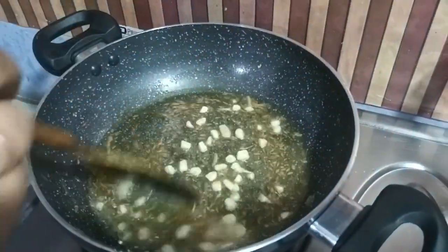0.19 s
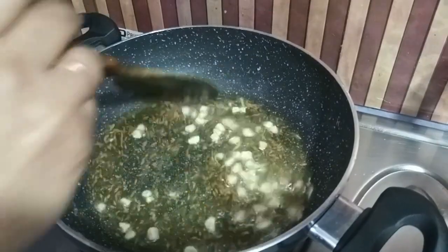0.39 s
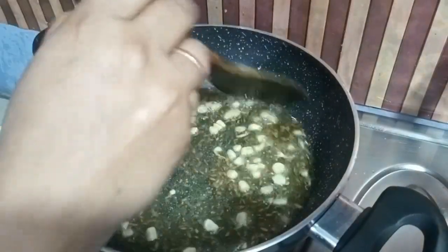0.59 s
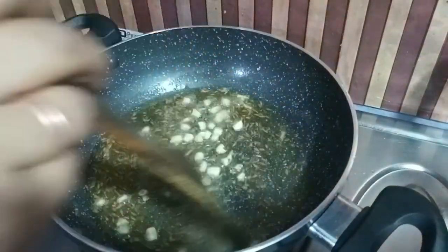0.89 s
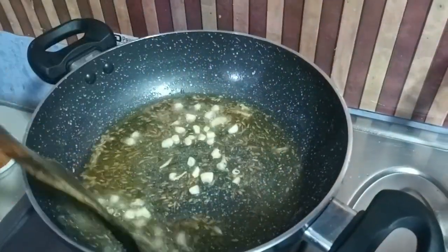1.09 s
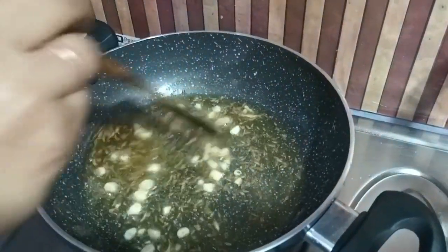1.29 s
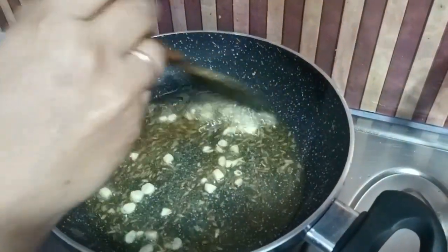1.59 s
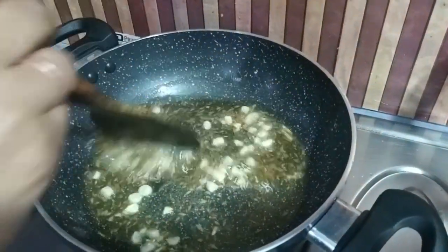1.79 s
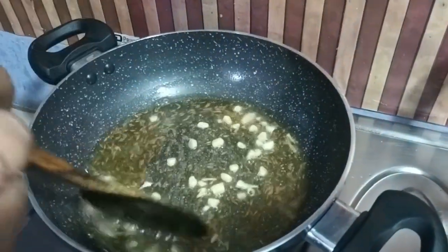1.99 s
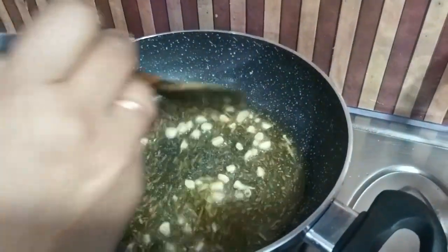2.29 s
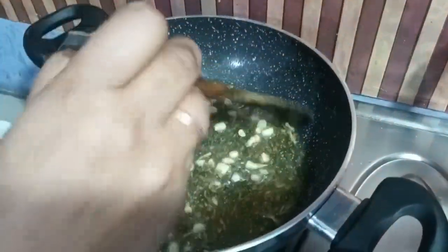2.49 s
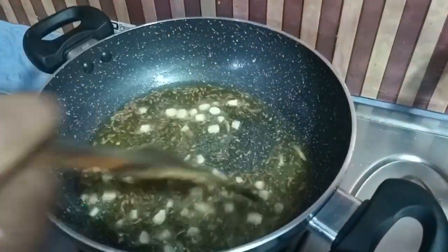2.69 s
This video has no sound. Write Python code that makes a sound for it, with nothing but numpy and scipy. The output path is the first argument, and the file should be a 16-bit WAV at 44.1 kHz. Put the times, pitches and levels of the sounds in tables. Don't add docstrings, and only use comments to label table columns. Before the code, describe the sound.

Garlic and seeds fry with a steady, bright, fine sizzle while a wooden spatula scrapes and knocks the ringing pan; oil spits, low thumps jolt the handheld phone, and the hardest clack comes midway, close up in a kitchen.

```python
import sys
import numpy as np
from scipy import signal
from scipy.fft import rfft, irfft
from scipy.io import wavfile
from scipy.ndimage import uniform_filter1d

SR = 44100
rng = np.random.default_rng(int(sys.argv[2]) if len(sys.argv) > 2 else 0)


def elevation(decibels):
    levels = np.asarray(decibels, float)
    return 10 ** (levels / 20)


def transcribe(u):
    v = np.clip(np.atleast_2d(u).T, -1, 1)
    q = np.round(v * 32767).astype(np.int16)
    wavfile.write(sys.argv[1], SR, q)


N = 125685


def unit(x):
    return x / np.sqrt(np.mean(x ** 2))


def band(x, hz, width_hz):
    return signal.lfilter(*signal.iirpeak(min(hz, 9900.), hz / width_hz, fs=SR), x)


def band_twice(x, hz, width_hz):
    return band(band(x, hz, width_hz), hz, width_hz)


def filter_steep(x, design):
    return signal.sosfilt(design, x)


def level_curve(table):
    return elevation(np.interp(np.arange(N) / SR, *np.array(table).T))


def walk(rate_hz):
    hold = int(SR / rate_hz)
    steps = np.repeat(rng.standard_normal(N // hold + 1), hold)
    return 1.4 * uniform_filter1d(uniform_filter1d(steps, hold), hold)[:N]


def clicks(rate_per_s, scatter_db):
    chance, size = rng.random(N), rng.exponential(size=N)
    sign = np.sign(chance - rate_per_s / SR / 2) * (chance < rate_per_s / SR)
    return sign * elevation(scatter_db * np.minimum(size, 5))


def even(x):
    return x / np.sqrt(uniform_filter1d(x ** 2, size=120) + .1)


def fade_60(t, t60_s):
    return 1000. ** (-t / t60_s)


def add(out, at_s, x):
    i = int(at_s * SR)
    out[i:i + len(x)] += x[:N - i]


# (time [s], level [dB])
FIZZ_LEVEL = [
    (0.0, -44),
    (2.09, -44.5),
    (2.54, -46),
    (2.85, -44.5),
]
# (frequency [Hz], spectral level [dB])
FIZZ_COLOUR = [(1200, -15.5), (1650, -12), (2100, -7), (4300, -4.5), (5000, -6.5), (5600, -1.5),
               (7400, -0.5), (8100, -6)]


def fizz():
    bubble_share, whistle_share = 0.18, 0.15
    swell = walk(4.1)
    out = np.zeros(N)
    for hz in 1250 * 2 ** np.arange(0, 3.1, .25):
        bursts = band(clicks(2500 / 8, -2.5), hz, hz / 0.63)
        hiss = unit(rng.standard_normal(N))
        mix = np.sqrt(bubble_share) * unit(bursts) + np.sqrt(1 - bubble_share) * hiss
        whistles = np.zeros(N)
        for pitch_hz in hz * rng.uniform(.92, 1.0, 3):
            whistles += band(clicks(360 / 40, 1.5), pitch_hz, pitch_hz / 400)
        patchy_db = walk(19) + .4 * swell + 1.5 * (1250 / hz) ** 2 * walk(4.0)
        sound = np.sqrt(1 - whistle_share) * unit(band(mix, hz, hz / 5))
        sound += np.sqrt(whistle_share) * unit(whistles)
        out += np.sqrt(hz) * elevation(patchy_db) * sound
    hz, db = np.array(FIZZ_COLOUR).T
    bins_hz = np.arange(N // 2 + 1) * SR / N
    colour = elevation(np.interp(np.log(bins_hz + 1), np.log(hz), db))
    out = unit(irfft(rfft(out) * colour, N))
    wok_air = unit(band(rng.standard_normal(N), 1390, 63))
    return (out + elevation(-20 + 3 * walk(20)) * wok_air) * level_curve(FIZZ_LEVEL)


# (frequency [Hz], level [dB], 60 dB decay [s])
WOK_MODES = [(140, -2, 0.46), (178.6, -11.5, 0.34), (246, -2.5, 0.36), (308, -12.5, .3), (394, -10.5, 0.31),
             (489.4, -7.5, 0.26), (528.6, -8, 0.11), (613, -13.5, .17), (684, -12.5, .16),
             (750.6, -8.5, 0.23), (808, -8.5, 0.3), (881, -10.5, 0.2), (1030, -19, .09), (1382, -3, 0.085)]
RING_T = np.arange(int(.6 * SR)) / SR


def ring(favoured_hz, focus_db):
    t = RING_T
    hz, db, t60_s = np.array(WOK_MODES).T[:, :, None]
    noise = rng.standard_normal((len(WOK_MODES) + 1, len(t)))
    wobble = np.array([unit(band_twice(v, f, 60)) for v, f in zip(noise, hz[:, 0])])
    wobble = .8 * (hz > 330) * wobble * np.minimum(t / 0.011, 1)
    modes = (np.sin(2 * np.pi * hz * t) + wobble) * fade_60(t, t60_s)
    modes = (modes * elevation(db + focus_db * np.abs(np.log2(hz / favoured_hz)))).sum(0)
    rattle = unit(band_twice(noise[-1], favoured_hz, favoured_hz)) * fade_60(t, 0.17)
    return modes / np.abs(modes).max() + elevation(-7 + 0.44 * focus_db) * rattle


# (start [s], length [s], level [dB], brightness [Hz])
STROKES = [(0, 0.082, -65.5, 253), (.21, 0.07, -51, 1050), (.26, 0.076, -51, 600), (.43, 0.2, -53.5, 416),
           (.55, 0.077, -57, 970), (.655, 0.1, -56.5, 1100), (0.743, 0.2, -52.5, 788),
           (.97, 0.09, -68, 352), (1.1, 0.18, -52.5, 476), (1.15, 0.09, -53.5, 710),
           (1.16, 0.17, -54, 1270), (1.3, 0.22, -71.5, 255), (1.463, 0.13, -56, 164),
           (1.55, 0.059, -59, 1100), (1.58, 0.21, -61.5, 678), (2.04, 0.22, -73, 170),
           (2.3, 0.14, -66.5, 250), (2.42, 0.096, -57.5, 300), (2.46, 0.18, -55.5, 860),
           (2.559, 0.2, -59.5, 347)]


def scrapes():
    out = np.zeros(N)
    for at_s, length_s, level_db, bright_hz in STROKES:
        n = int(length_s * SR)
        slip = clicks(1200, 2.5)[:n] + 0.17 * rng.standard_normal(N)[:n]
        brightness = signal.butter(2, [bright_hz / 3, bright_hz], "band", fs=SR, output="sos")
        slip = filter_steep(slip * np.hanning(n), brightness)
        damped_ring = ring(.7 * bright_hz, -6) * np.exp(-RING_T / 0.03)
        sound = unit(signal.fftconvolve(slip, damped_ring))
        sound += elevation(-0.5) * unit(np.pad(slip, (0, len(RING_T) - 1)))
        add(out, at_s, elevation(level_db) * sound / np.sqrt(np.mean(sound[:n] ** 2)))
    return out


# (start [s], length [s], peak [dB], pitch [Hz])
RUBS = [(0, 0.079, -56, 247.6), (.215, 0.054, -46.5, 782), (.24, 0.031, -36.5, 751),
        (.238, 0.032, -43.5, 905), (.245, 0.068, -44.5, 492), (.245, 0.062, -40, 146.5),
        (.33, .03, -57.5, 790), (0.113, .06, -64, 797), (0, 0.13, -56.5, 62), (1.46, .07, -55, 140),
        (2.332, 0.065, -64, 318), (2.6, .08, -60, 331), (1.128, .03, -57, 500), (1.143, 0.036, -48, 650),
        (1.154, 0.022, -41, 770), (1.552, 0.029, -39, 1382), (1.6, 0.13, -43, 250.6),
        (1.72, 0.068, -57.5, 516), (1.78, .07, -64.5, 790), (2.04, 0.083, -63, 140),
        (2.13, 0.071, -58.5, 65.4), (2.3, .1, -59, 110), (2.43, 0.091, -50, 147), (2.66, 0.092, -51.5, 140),
        (0.226, .04, -46.5, 1326), (0.304, 0.034, -51.5, 1372), (.559, 0.043, -32, 249.3),
        (0.6, 0.031, -33.5, 262), (0.632, .035, -36.5, 252), (0.605, .035, -58, 1390),
        (.658, 0.046, -45.5, 1390), (.66, 0.038, -33.5, 144), (0.677, 0.038, -38.5, 244),
        (0.669, .04, -48, 570), (1.103, .04, -41, 109), (1.142, .06, -36, 89.3), (1.195, 0.049, -44, 1410),
        (1.215, 0.061, -31.5, 185.7), (1.231, 0.052, -49, 1440), (1.21, 0.044, -46.5, 884),
        (1.275, 0.05, -45.5, 235), (1.346, .06, -54.5, 240), (1.761, 0.058, -51, 1420)]


def rubs():
    out = np.zeros(N)
    for at_s, length_s, peak_db, hz in RUBS:
        u = np.arange(int(1.5 * length_s * SR)) / (length_s * SR)
        waver = 1 + .008 * walk(60)[:len(u)]
        swell = np.sin(np.pi / 2 * np.minimum(u / .3, 1)) * np.cos(np.pi / 2 * u / 1.5) ** 2
        add(out, at_s, -elevation(peak_db) * swell * np.sin(2 * np.pi * hz * np.cumsum(waver) / SR))
    return out


# (time [s], level [dB])
HAND_LEVEL = [(0, -55), (.07, -61.5), (.18, -77), (.27, -51), (.33, -52), (.6, -54), (.79, -44.5),
              (1, -50.5), (1.08, -55), (1.27, -49), (1.36, -57), (1.43, -88), (1.55, -69), (1.68, -60),
              (1.88, -79.5), (2.4, -75), (2.5, -57), (2.85, -79)]


def hand_tremor():
    rumble = unit(band_twice(rng.standard_normal(N), 88, 95))
    return rumble * level_curve(HAND_LEVEL) * elevation(3.5 * walk(25.19))


# (time [s], peak [dB], favoured pitch [Hz], fall-off away from it [dB per octave])
KNOCKS = [(.2465, -33, 770, -11.5), (.246, -33.5, 1390, -30), (.254, -37.5, 475, -12),
          (.258, -30, 143, -19.5), (.664, -30, 160, -3.5), (.905, -44.5, 800, -26.5),
          (1.186, -34.5, 1030, -20), (1.195, -28.5, 161, -23), (1.5503, -25, 883, -1),
          (1.5514, -18, 610, -4), (1.554, -23, 143, -19.5), (1.5575, -28.5, 860, -11.5),
          (1.562, -28, 535, 2.5), (1.571, -29.5, 755, -12.5), (1.576, -27.5, 140, -14),
          (1.589, -40, 800, -1), (1.6, -31, 250, -12), (2.498, -31, 587, -19), (2.512, -31.5, 244, -5),
          (2.545, -35.5, 258, -23), (2.599, -44, 140, -18)]


def knocks():
    out = np.zeros(N)
    for at_s, peak_db, favoured_hz, focus_db in KNOCKS:
        tock = np.sin(2 * np.pi * favoured_hz * RING_T) * fade_60(RING_T, .02)
        contact = np.hanning(int(0.35 / favoured_hz * SR) + 3)
        hit = np.convolve(ring(favoured_hz, focus_db) + tock, contact)
        swell_s = 0.44 * np.clip(-10.5 - focus_db, .04, 30)
        hit *= 2.0 - np.exp(-np.arange(len(hit)) / SR / swell_s)
        add(out, at_s, -elevation(peak_db) * hit / np.abs(hit).max())
    return out


# (time [s], peak [dB], cavity pitch [Hz], 60 dB decay [s], crack level [dB])
POPS = [(0.319, -34, 5600, 0.22, -33), (.3335, -18.5, 5750, 0.071, -10.5), (0.4242, -30.5, 3600, 0.16, 13),
        (0.426, -29, 4400, .04, -9), (0.6116, -24, 3900, 0.053, 2.5), (.621, -25.5, 4300, 0.14, -20),
        (.699, -33, 5300, 0.17, -13), (.7095, -38.5, 5300, .05, 15.5), (0.7521, -30, 3300, .15, 15),
        (0.762, -29, 5500, .04, 4), (0.787, -44.5, 7400, 0.081, -23), (.955, -33, 8700, 0.12, -11),
        (0.959, -32, 6400, 0.088, -25), (1.2004, -38, 3750, 0.39, 15), (1.391, -31, 4150, 0.15, -3),
        (1.51, -34, 5430, 0.055, -3), (1.5492, -36.5, 4400, 0.18, 7), (1.578, -34.5, 3280, 0.12, 8),
        (2.135, -39, 3350, 0.2, -2), (2.155, -38, 3970, 0.14, 11.5), (2.189, -20.5, 6570, 0.028, -14.5),
        (2.192, -34, 6100, 0.12, -11), (2.191, -28, 9200, 0.11, -15), (2.224, -33, 6230, .15, -9),
        (2.236, -27, 5730, .06, -4), (2.244, -33, 6550, 0.13, -7.5), (2.242, -31, 4900, .15, -9),
        (2.2495, -30, 6600, .1, -11), (2.252, -29, 4630, 0.088, -10), (2.481, -37.5, 6660, 0.13, 3)]


def pops():
    out, t = np.zeros(N), np.arange(SR // 5) / SR
    for at_s, peak_db, hz, t60_s, crack_db in POPS:
        noise = rng.standard_normal((3, len(t)))
        sputter = elevation(2.5 * unit(uniform_filter1d(noise[2], 60)))
        tail = unit(band_twice(noise[0], hz, .26 * hz))
        core = unit(band(tail, hz, .05 * hz))
        tail = even(tail + elevation(-3) * core) * sputter * fade_60(t, t60_s)
        crack = even(unit(band(band(noise[1], 3500, 4000), 5800, 8000)))
        crack = elevation(crack_db) * crack * np.exp(-t / .004)
        add(out, at_s, elevation(peak_db - 8.5) * (tail + crack) * (1 - np.exp(-t / .0009)))
    return out


# (time [s], peak [dB], pitch factor [1])
THUMPS = [(0.379, -29, 0.49), (0.3893, -18.5, 0.89), (0.4002, -25.5, .9), (0.733, -39, 0.73),
          (.813, -19, 0.88), (0.831, -25.5, 0.58), (.845, -14.5, 0.9), (.928, -16.5, 0.86),
          (1.133, -32, 0.77), (1.150, -36, 0.37), (1.174, -35, 0.66), (1.262, -32.5, 0.96),
          (1.291, -37, 0.58), (1.328, -36, 0.7), (2.471, -29, 0.72), (2.503, -31.5, 0.71),
          (2.528, -30.5, 0.84)]


def thumps():
    start_hz, end_hz, sag_s = 258, 70.6, 0.0054
    rise_s, fade_s = 0.0031, 0.0051
    out, t = np.zeros(N), np.arange(SR // 12) / SR
    turns = end_hz * t + (start_hz - end_hz) * sag_s * (1 - np.exp(-t / sag_s))
    rise = (t / rise_s) ** 2 / (1 + (t / rise_s) ** 2)
    shape = rise * np.exp(-t / fade_s)
    for at_s, peak_db, pitch in THUMPS:
        swing = -shape * np.sin(2 * np.pi * pitch * turns)
        add(out, at_s, elevation(peak_db) * swing / np.abs(swing).max())
    return out


def suppress(low):
    threshold_db, depth_db, smooth_s = -74, -18, .018
    z = signal.stft(low, nperseg=1024, noverlap=768)[2]
    power = uniform_filter1d(np.abs(z) ** 2, size=3, axis=0)
    power = uniform_filter1d(power, max(int(smooth_s * SR / 256), 1))
    over = (10 * np.log10(power.clip(1e-16)) - threshold_db) / 6.8
    gain = elevation(depth_db / (1 + np.exp(over.clip(-30, 30))))
    return signal.istft(z * gain, nperseg=1024, noverlap=768)[1][:N]


def scene():
    frying_cut = signal.ellip(6, .5, 50, 1190, "high", fs=SR, output="sos")
    frying = filter_steep(fizz() + pops(), frying_cut)
    wok_cut = signal.butter(2, 70.7, "high", fs=SR, output="sos")
    wok = filter_steep(scrapes() + knocks(), wok_cut)
    low = suppress(wok + rubs() + hand_tremor() + thumps())
    residue = elevation(-78.5 + 1.5 * walk(8.8)) * unit(band(rng.standard_normal(N), 400, 1400))
    mono = frying + low + residue
    return np.array([mono, mono])


def top_cut(x):
    return signal.sosfilt(signal.butter(12, 10830, fs=SR, output="sos"), x)


def record(dry):
    x = filter_steep(dry, signal.butter(3, 45, "high", fs=SR, output="sos"))
    x = filter_steep(x, signal.ellip(14, .2, 60, 9720, fs=SR, output="sos"))
    return top_cut(x)


dry = scene()
out = record(dry)
transcribe(out)
```